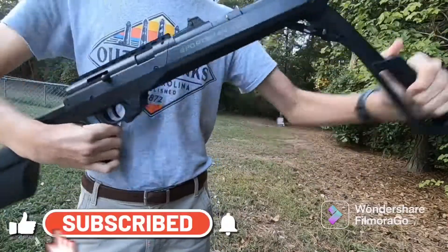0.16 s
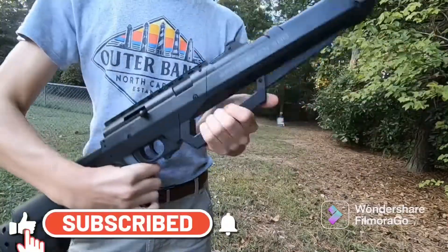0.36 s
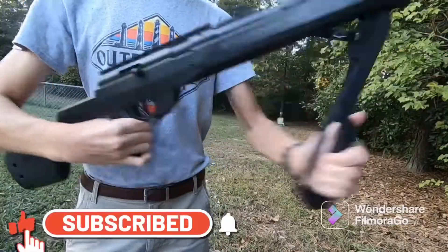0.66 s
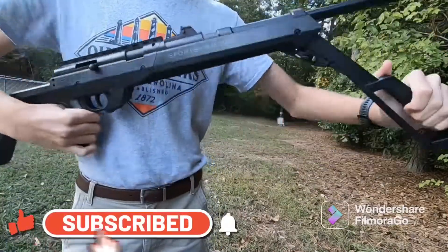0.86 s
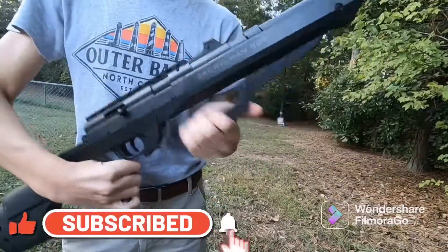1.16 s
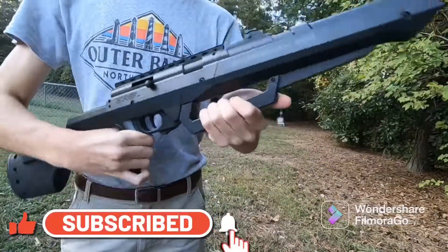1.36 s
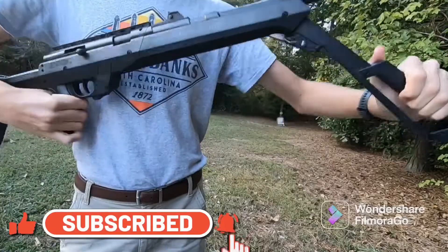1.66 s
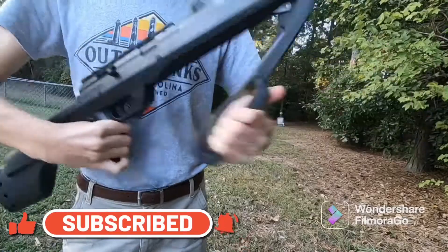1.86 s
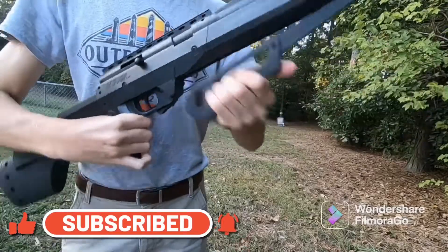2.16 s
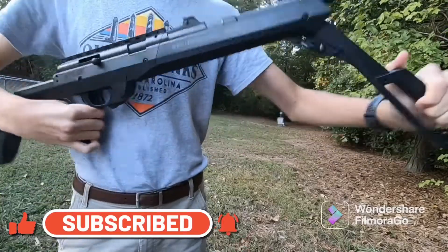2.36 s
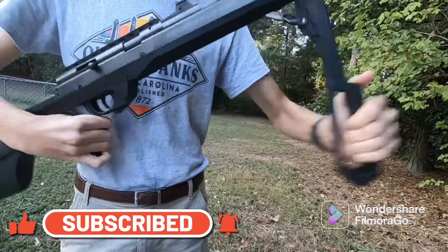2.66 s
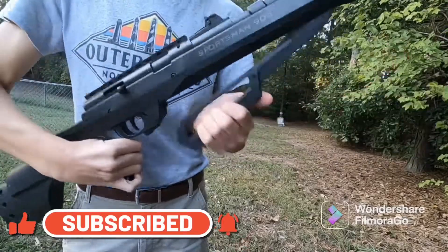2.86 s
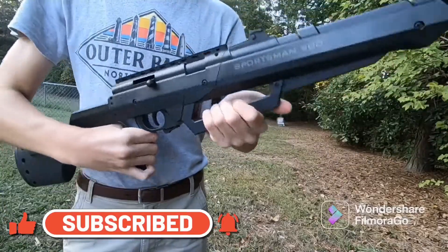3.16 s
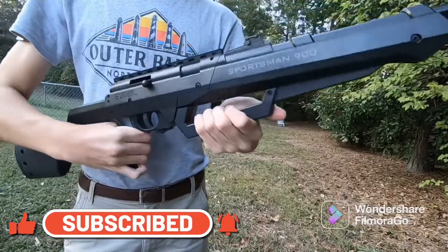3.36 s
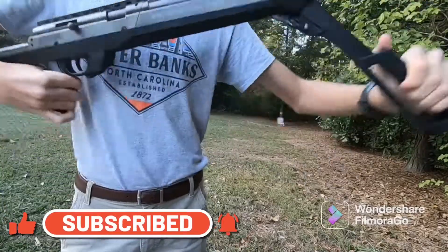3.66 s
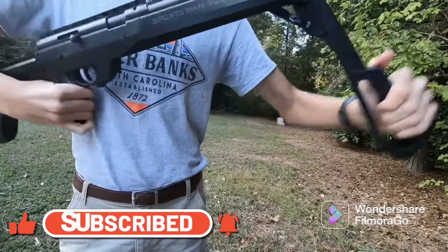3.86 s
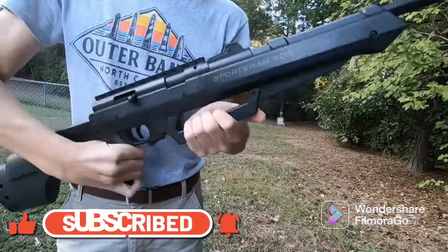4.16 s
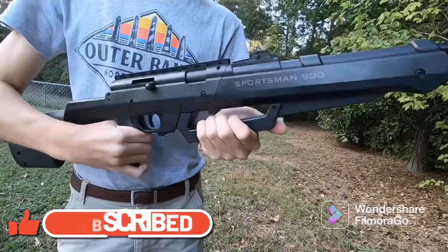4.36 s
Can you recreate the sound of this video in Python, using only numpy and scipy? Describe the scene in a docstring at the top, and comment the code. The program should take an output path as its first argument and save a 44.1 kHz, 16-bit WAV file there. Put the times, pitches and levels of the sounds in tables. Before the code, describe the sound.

An air rifle is pumped steadily outdoors, its lever scraping and rattling open, then slamming shut with sharp plastic and metal clacks.

```python
"""In a garden, someone pumps up an air rifle. The lever snaps off its catch, rattles and scrapes as the
piston moves, thumps when fully open and slams shut on the plastic stock. Hits and scraping make the
rifle's body ring at many pitches at once: low ones in the stock, middle ones in the lever, high ones in
the metal parts. Trees send back a faint echo; a background hiss and an insect fill the gaps."""
import sys
import numpy as np
from scipy import signal
from scipy.io import wavfile

SR = 44100
rng = np.random.default_rng(int(sys.argv[2]) if len(sys.argv) > 2 else 0)


def put_to_file(sound):
    """Save the sound as 16-bit audio at rate SR, in the file named by the first command-line argument."""
    columns = np.atleast_2d(sound).T  # one column per channel
    safe = np.clip(columns, -1, 1)
    whole_steps = np.round(safe * 32767)
    wavfile.write(sys.argv[1], SR, whole_steps.astype(np.int16))


N = 199222

# hard hits: (time [s], level [dB], stock ringing [dB], metal ringing [dB], contact length [s])
SLAMS = [(0.506, 4, -9.5, -11.5, 0.004), (1.323, 4, -9, -14, 0.0042), (2.147, 3.5, -11.5, -16, 0.0028),
         (3.041, 5, -8.5, -13.5, 0.0039), (4.286, 5.5, -10, -14, 0.0051)]   # the lever slams shut
SNAPS = [(0.751, -3.5, -20.5, -8, 0.0026), (1.582, -1, -25.5, -8, 0.0024), (3.565, 0, -28.5, -11.5, 0.0021)]   # the catch lets go
CLACKS = [(1.961, -13, -11.5, -23, 0.0035), (3.135, -2.5, -11, -17, 0.0047)]   # the lever clacks against the stock


def from_db(db):
    """Turn decibels into a number to multiply the sound by."""
    return 10 ** (np.asarray(db) / 20)


def rms_one(x):
    """Scale a signal so its average strength (rms) is 1."""
    return x / np.sqrt(np.mean(x ** 2) + 1e-20)


def at_hz(points, hz):
    """Read between a table's (frequency, value) points on an octave scale."""
    freqs, values = np.transpose(points)
    return np.interp(np.log(hz), np.log(np.maximum(freqs, 1)), values)


def drift(rate_hz):
    """A smooth random wobble of typical size 1."""
    r = np.exp(-2 * np.pi * rate_hz / SR)
    return rms_one(signal.lfilter([1], [1, -2 * r, r * r], rng.standard_normal(N + SR))[SR:])


def cut_below(x, hz):
    """Weaken everything lower than hz."""
    return signal.sosfilt(signal.butter(2, hz, "high", fs=SR, output="sos"), x)


def resonate(x, hz, width_hz):
    """Make x ring at one pitch; a wider resonance dies away sooner."""
    r, angle = np.exp(-np.pi * width_hz / SR), 2 * np.pi * hz / SR
    return signal.lfilter([.5, 0, -.5], [1, -2 * r * np.cos(angle), r * r], x + 1e-18)


def stereo(mid, side, hz):
    """Left and right share the mid signal and get the side signal with opposite signs."""
    # stereo width: (frequency [Hz], side minus mid [dB])
    spread = [(100, -11.5), (1000, -10.5), (3000, -17), (5500, -8.5), (10000, -1.5)]
    # balance: (frequency [Hz], left minus right [dB])
    balance = [(200, 1.5), (2000, -0.5), (4000, 0), (6000, -6), (9000, 4)]
    lean = from_db(at_hz(balance, hz) / 2)
    return (mid + from_db(at_hz(spread, hz)) * side * [[1], [-1]]) * [[lean], [1 / lean]]


def background_hiss():
    """Hiss whose level and treble are turned down in quiet moments and come back up with the action."""
    # tone of the hiss: (frequency [Hz], relative level [dB])
    tone = [(30, -13.5), (70, -13.5), (110, -20.5), (170, -3), (300, -12), (550, -19), (900, 0.5),
            (2600, -2.5), (4200, -6.5), (6500, -9), (9000, -18.5), (14000, -49)]
    # the hiss is turned down and up at set times: (time [s], level [dB])
    volume = [(0, -50), (.6, -54), (1.1, -51), (1.5, -55), (1.93, -53), (2.27, -57), (2.6, -55.5),
              (2.72, -84.5), (2.85, -63.5), (3.25, -55), (3.36, -63.5), (3.42, -69), (3.54, -68.5),
              (3.76, -62.5), (4.08, -60), (4.4, -54), (4.52, -58.5)]
    # how far each band is turned down and up: (frequency [Hz], share of the level change [factor])
    depth = [(170, 0.33), (1000, 0.81), (4000, 0.33), (9000, 1.2)]
    level_db = np.interp(np.arange(N) / SR, *np.transpose(volume))
    mean_db = level_db.mean()
    edges = 25 * 2 ** np.arange(0, 9.6, .5)   # Hz, half an octave apart
    noise = rng.standard_normal((2, 2, N))
    out, steady = 0, 0
    for k, (low, high) in enumerate(zip(edges, edges[1:])):
        band_filter = signal.butter(2, [low, high], "band", fs=SR, output="sos")
        mid, side = signal.sosfilt(band_filter, noise[k % 2])
        hz = np.sqrt(low * high)
        band = from_db(at_hz(tone, hz) + 0.5 * drift(13)) * stereo(mid, from_db(7) * side, hz)
        steady += band
        out += band * from_db(at_hz(depth, hz) * (level_db - mean_db))
    return from_db(mean_db) * out / np.std(steady)


def insect():
    """An insect trills: a high tone that buzzes with fast random flutter."""
    # trills: (start [s], end [s], level [dB], pitch [Hz])
    trills = [(.665, 0.746, -60, 5320), (2.632, 2.808, -67, 5220), (2.843, 2.897, -58, 5420),
              (3.196, 3.409, -69, 5400), (3.97, 4.054, -63, 5060)]
    t, out, fade_s = np.arange(N) / SR, 0, 0.041
    flutter = [drift(130), drift(90)]
    for start, end, db, hz in trills:
        gate = np.clip(np.minimum(t - start, end - t) / fade_s + .5, 0, 1)
        phase = 2 * np.pi * hz * t
        out += from_db(db) * gate * (flutter[0] * np.sin(phase) + flutter[1] * np.cos(phase))
    return out * from_db([[-1.5], [1.5]])


def tree_echo(x, fade_s=0.19, echo_db=-21):
    """Trees scatter the sound into a short echo; left and right share its bass but not its treble."""
    t = np.arange(SR // 2) / SR
    mid, side = rng.standard_normal((2, len(t))) * from_db(-60 * t / fade_s) * (t > .006)
    tail = (mid + 0.8 * cut_below(side, 4000) * [[1], [-1]]) / np.sqrt(np.sum(mid ** 2))
    return from_db(echo_db) * signal.fftconvolve(x, tail, axes=1)[:, :N]


def thumps():
    """Soft pushes on the rifle: low swings that build, sag in pitch and quickly die."""
    # the fully open lever jolts the hands: (time [s], level [dB])
    stops = [(0.151, -36), (0.943, -39), (1.789, -35.5), (2.534, -38), (3.824, -36.5)]
    # the lever's links bump the stock twice: (time [s], level [dB], second time [s], second level [dB])
    bumps = [(.8, -53.5, 0.87, -52), (1.629, -48, 2, -54), (2.362, -55, 2.418, -50.5),
             (3.619, -54, 3.678, -51.5)]
    hollow_hz, sag_per_s = 183, 3.6
    # each push: (time [s], level [dB], pitch [Hz], fade time [cycles]); first the hollow stock booms
    pushes = [(s - .002, db - 39, hollow_hz, .7) for s, db, *_ in SLAMS + CLACKS]
    pushes += [(s + .0038, db - 51.5, hollow_hz, .7) for s, db, *_ in SNAPS]
    pushes += [(s + .011, db - 47.5, 78, .65) for s, db, *_ in SLAMS]   # thud into the hands
    pushes += [(s, db, 87, .083) for s, db in stops]
    pushes += [(s, db, 200, .52) for s, db, _, _ in bumps]
    pushes += [(s, db, 169, .52) for _, _, s, db in bumps]
    t, out = np.arange(SR // 6) / SR, np.zeros(N + SR)
    for s, db, hz, cycles in pushes:
        phase = 2 * np.pi * hz * np.log1p(sag_per_s * t) / sag_per_s
        swing = t * np.exp(-t * hz / cycles) * np.sin(phase)
        at = round(s * SR)
        out[at:at + len(t)] += from_db(db) * swing / np.max(abs(swing))
    return cut_below(out[:N], 35) * from_db([[.4], [-.4]])


def colour(bright_db):
    """Level changes (stock, metal) in dB: brightness above 0 weakens the stock, below 0 the metal."""
    return -max(bright_db, 0), min(bright_db, 0)


def slides_and_rattles():
    """How strongly sliding and rattling shake the stock, lever and metal at each moment."""
    # lever and piston slide: (start [s], end [s], first level [dB], last level [dB], brightness [dB])
    slides = [(0, 0.047, -36, -44, -5.5), (0.047, 0.13, -36, -38.5, 8), (0.133, 0.267, -33, -38, -2.5),
              (0.299, 0.32, -38.5, -62, 9.5), (0.357, 0.394, -60, -54, 6), (0.421, 0.487, -45, -44.5, 4),
              (0.792, 0.853, -41.5, -46, -3), (0.855, 0.94, -40, -40, 4), (0.943, 1.056, -35.5, -45, 2),
              (1.126, 1.202, -52, -47, 2.5), (1.208, 1.33, -34, -51, 2.5), (1.619, 1.683, -44, -43.5, 5),
              (1.687, 1.778, -31, -48, 5), (1.775, 1.89, -36, -42.5, 2), (1.978, 2.118, -48, -40, 5.5),
              (2.3, 2.419, -52, -47.5, -2), (2.428, 2.502, -32, -49, 4.5), (2.511, 2.58, -45.5, -39.5, 0),
              (2.588, 2.661, -51.5, -62.5, -4.5), (2.809, 2.898, -62.5, -55.5, 0),
              (2.896, 2.965, -42.5, -44, 3), (2.993, 3.048, -44.5, -44.5, -5),
              (3.613, 3.689, -35.5, -50.5, 0), (3.688, 3.749, -33.5, -63, 8.5),
              (3.813, 3.87, -34.5, -29.5, -7.5), (3.892, 3.905, -44, -53, -16),
              (4.139, 4.18, -54.5, -51, 6), (4.198, 4.224, -48.5, -58.5, -11), (4.26, 4.275, -39, -50, -26)]
    # each hard hit shakes parts loose for a moment
    shakes = [(s, db - 42) for s, db, *_ in SLAMS + CLACKS] + [(s, db - 44) for s, db, *_ in SNAPS]
    rattles = [(s, s + 0.088, db, db - 25.5, 0) for s, db in shakes]
    t, out = np.arange(N) / SR, np.zeros((3, N))
    for start, end, first_db, last_db, bright_db in slides + rattles:
        gate = np.clip(np.minimum((t - start) / .004, (end - t) / .015 + .5), 0, 1)
        level = from_db(np.interp(t, [start, end], [first_db, last_db]))
        stock_db, metal_db = colour(bright_db)
        out += gate * level * from_db([[stock_db - 2.5], [0], [metal_db + 0.5]])
    return out


def grit(slips_per_s=300):
    """Pivots and piston seal stick and slip in tiny clumped jerks, which roughens the scraping."""
    # makes each slip swell and fade in about a millisecond: (filter weights [no unit])
    slip_shape = [1, -1.93, .9312]
    slips = rng.random(N) < slips_per_s / SR * from_db(3 * drift(25))
    grains = slips * from_db(2.8 * np.minimum(rng.exponential(1, N), 3))
    return 0.39 + 0.83 * rms_one(signal.lfilter([1], slip_shape, grains))


def contacts():
    """All hits, hard ones first, with the columns of SLAMS plus rise time [s]; hard hits rise fastest."""
    # the lever's loose links knock: (time [s], level [dB], brightness [dB])
    knocks = [(0.004, -15, -17), (0.019, -25, -17), (0.062, -15.5, 7), (0.079, -22, 16), (0.126, -23, 13),
              (0.152, -26, -6), (0.176, -8.5, -4), (0.206, -15.5, 2.5), (0.219, -23, 0), (0.32, -28, 7),
              (0.377, -24, 22), (0.387, -30, 24), (0.412, -26.5, 25), (0.429, -23.5, 6), (0.454, -18, 17),
              (0.727, -36, 22), (0.801, -11.5, -29), (0.812, -15, -28), (0.86, -18, 8), (0.868, -34, 8),
              (0.875, -16, 11), (0.884, -22.5, 17), (0.942, -11.5, -30), (0.967, -8, -13),
              (0.987, -15, 1.5), (1.002, -21, 17), (1.019, -19, 34), (1.141, -20.5, -37), (1.162, -32, 12),
              (1.182, -26, 29), (1.229, -13, 11), (1.265, -23.5, 18), (1.49, -23, 11.5), (1.632, -9.5, -29),
              (1.646, -19, 2), (1.685, -16, 23), (1.691, -13, 15), (1.699, -22, 23), (1.741, -19, 24),
              (1.787, -20.5, -30), (1.8, -15, -1), (1.812, -9, -3), (1.831, -15, -1.5), (1.854, -23, 9),
              (1.871, -21.5, 17), (1.89, -30.5, 4), (2.003, -21.5, 4), (2.033, -16.5, 10), (2.063, -17, 32),
              (2.095, -25.5, -1), (2.204, -35.5, 16), (2.337, -25, 10), (2.369, -13.5, -23),
              (2.384, -22, -30), (2.425, -22, 7), (2.432, -25, 4), (2.446, -16, 3.5), (2.515, -26, 23),
              (2.527, -23, 13), (2.56, -20, 0), (2.61, -31, 10), (2.619, -28.5, 6.5), (2.816, -39, -1.5),
              (2.865, -36.5, 5), (2.902, -17.5, 10), (2.926, -21, 15), (2.938, -17, 13),
              (3.122, -14.5, -13), (3.147, -18.5, -10), (3.166, -21, -8.5), (3.216, -28.5, 10),
              (3.364, -31, 7), (3.39, -41, -25), (3.622, -14, -22), (3.693, -13.5, 25), (3.801, -33, 11),
              (3.827, -13.5, -8), (3.847, -8.5, -11), (3.869, -13.5, -23), (3.945, -25, 8),
              (3.96, -20.5, 28), (4.042, -35, -0.5), (4.157, -26, 7), (4.175, -32, 18), (4.213, -20.5, 10),
              (4.253, -18.5, -25)]
    hits = [(*row, .0004) for row in SLAMS + SNAPS + CLACKS]
    for s, db, bright_db in knocks:
        stock_db, metal_db = colour(bright_db)
        hits.append((s, db, stock_db - 9.5, metal_db - 6.5, .0056, .001))
    # the lever touches its catch just before it shuts
    hits += [(s - .011, db - 24, -5, -16, .007, .0012) for s, db, *_ in SLAMS]
    return np.array(hits)


def contact_force(hits, gains):
    """Each hit's force rises fast, then falls by 60 dB over four contact lengths."""
    t, force = np.arange(SR // 25) / SR, np.zeros(N + SR)
    for (s, length, rise), gain in zip(hits[:, [0, 4, 5]], gains):
        shape = (1 - np.exp(-t / rise)) * from_db(-60 * t / (4 * length))
        at = round((s - rise / 2) * SR)
        force[at:at + len(t)] += gain * shape / np.sqrt(np.sum(shape ** 2))
    return force[:N]


def rifle():
    """Chattering hits and gritty scraping make the body ring at each of its natural pitches (modes)."""
    # modes of the body: (pitch [Hz], width before damping [Hz], level [dB])
    modes = [(335.9, 179, -13), (538.7, 190, -10.5), (778.7, 110, -9), (1005.3, 63, -1.5),
             (1258.8, 158, 4.5), (1621, 100, -3.5), (2078, 400, 0.5), (2425, 100.5, -1), (3156, 261, 3.5),
             (3596, 342, 7), (4386, 470, 3.5), (5197, 530, 3.5), (6047, 787, 8), (6764, 228, 0),
             (7230, 268, -1), (8160, 930, 5.5), (9210, 640, -1), (10400, 900, -49.5), (13040, 3000, -43.5)]
    stock_top_hz, lever_top_hz = 1900, 4000
    hit_damping, knock_damping, rub_damping = 3.32, 1.76, 0.93   # parts pressed together ring shorter
    hits, sliding = contacts(), slides_and_rattles()
    uneven_db = 2 * rng.standard_normal((len(hits), len(modes)))
    roughness = grit()
    part_db = [hits[:, 2], -8, hits[:, 3]]   # stock, lever, metal
    hard = np.arange(len(hits)) < len(SLAMS + SNAPS + CLACKS)
    out = np.zeros((2, N))
    for k, (hz, width, db) in enumerate(modes):
        part = int(hz > stock_top_hz) + int(hz > lever_top_hz)
        gains = from_db(hits[:, 1] + part_db[part] - 8 + uneven_db[:, k])
        low_boost = from_db(5 * (hz < 800))   # hard hits reach the lowest modes better
        blows = contact_force(hits[hard], gains[hard]) * low_boost
        taps = contact_force(hits[~hard], gains[~hard]) * from_db(-3)
        flicker = from_db(2.5 * drift(18))
        scrape = sliding[part] * from_db(-22.5) * flicker * roughness
        phase_steps = 2 * np.pi * hz / SR + .3 * rng.standard_normal((2, N))
        chatter = np.cos(np.cumsum(phase_steps, axis=1))   # an unsteady push near the mode's pitch
        struck = resonate(chatter * blows, hz, hit_damping * width)
        knocked = resonate(chatter * taps, hz, knock_damping * width)
        rubbed = resonate(rng.standard_normal((2, N)) * scrape, hz, rub_damping * width)
        rubbed *= from_db(36.5 * (hz > 12000))   # the piston seal hisses into the highest mode
        # a second, wider resonance keeps the gaps between modes quiet
        wide_hz = 5.4 * width
        loose = (1 - np.exp(-2 * np.pi * wide_hz / SR)) * resonate(rubbed + knocked, hz, wide_hz)
        mid, side = struck + loose
        out += from_db(db) * stereo(mid, side, hz)
    return cut_below(out, 250)   # a slim body gives off little bass


def scene():
    """The rifle, its echo, the hiss and the insect."""
    gun = rifle() + thumps()
    return gun + tree_echo(gun) + background_hiss() + insect()


def record(dry):
    """The microphone dulls the high treble, squashes loud peaks and cuts off the very top."""
    dull = signal.sosfilt(signal.butter(3, 10500, fs=SR, output="sos"), dry)
    squashed = dull / (1 + dull ** 4) ** (1 / 4)
    return signal.sosfilt(signal.cheby2(14, 90, 16300, fs=SR, output="sos"), squashed)


dry = scene()
out = record(dry)
put_to_file(out)
```